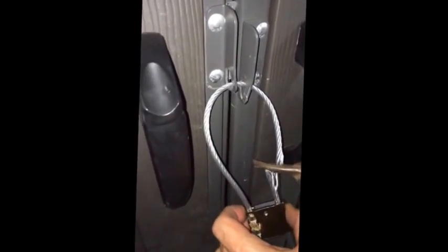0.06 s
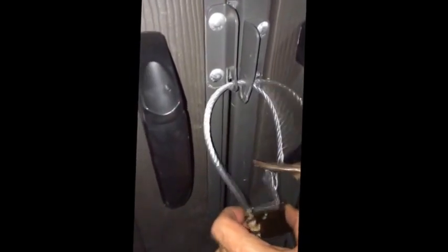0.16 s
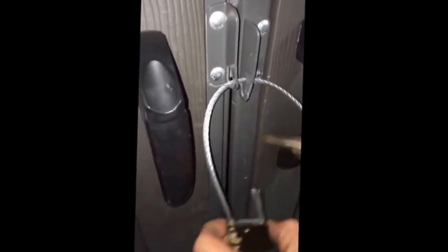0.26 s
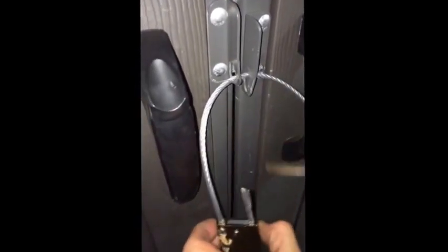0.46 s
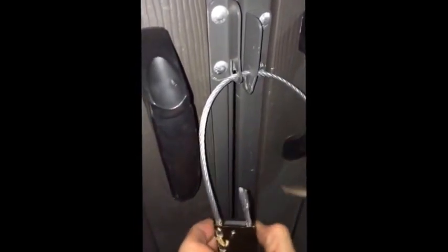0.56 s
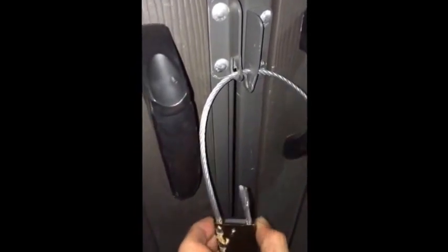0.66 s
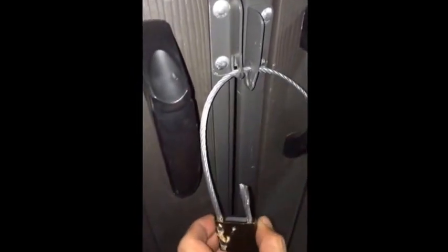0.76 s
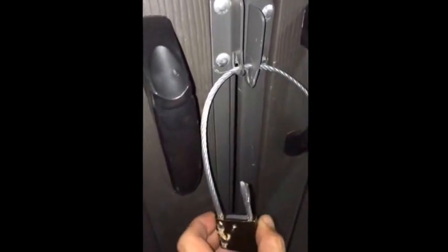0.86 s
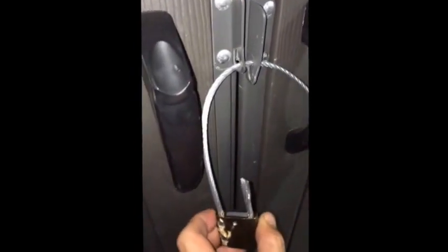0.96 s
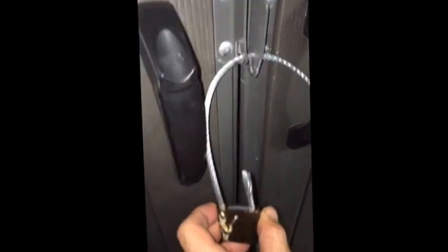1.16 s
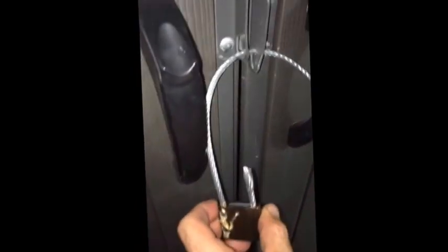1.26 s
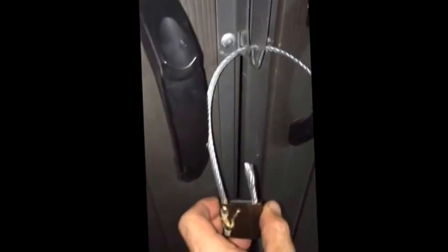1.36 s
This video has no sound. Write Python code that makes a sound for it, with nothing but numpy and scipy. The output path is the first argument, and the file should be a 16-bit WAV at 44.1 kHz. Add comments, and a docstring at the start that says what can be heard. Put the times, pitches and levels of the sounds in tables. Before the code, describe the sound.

A steel cable is cut close to the microphone: strands tick, then part in one sharp snap. The freed seal knocks a hollow door, which booms briefly. Faint finger handling follows over a low hum.

```python
"""A steel cable seal is cut at the latch of a hollow door, close to the microphone.
Over the low hum of the place, strands tick as the cutter bites, each with a short room tail.
The rest part in one snap, and the freed seal knocks the door, which booms, rocks and settles.
Then the hands shift faintly on the seal."""
import sys
import numpy as np
from scipy import signal
from scipy.fft import rfft, irfft
from scipy.io import wavfile
from scipy.ndimage import uniform_filter1d

SR = 44100
rng = np.random.default_rng(int(sys.argv[2]) if len(sys.argv) > 2 else 0)


def inscribe(sig):
    """Save sig as 16-bit PCM at rate SR to the path in sys.argv[1].

    A 1-D sig is mono; a 2-D sig holds one channel per row.
    Samples are clipped to [-1, 1] before scaling.
    """
    pcm = np.round(np.clip(np.atleast_2d(sig).T, -1, 1) * 32767)
    wavfile.write(sys.argv[1], SR, pcm.astype(np.int16))


N = 61739
KNOCK_S = 0.2468

# The bright crack of steel. Each row: frequency in Hz, level in dB.
STEEL_COLOUR = [(500, -7.5), (1500, -4.5), (2400, -11.5), (3300, -12), (4200, -2.5), (5000, -4),
                (6600, -5.5), (8000, 0), (10500, -8.5), (12000, -8.5), (13200, -10), (14500, -8),
                (16000, -17.5)]
# The ring of the cutter's jaws. Each row: frequency in Hz, level in dB, T60 in seconds.
CUTTER_MODES = [(1904, -8.5, .03), (2368, -1, 0.028), (2528, -11.5, 0.018), (4783, -12, 0.031),
                (5052, -19.5, 0.032), (8590, -16, 0.012), (12150, -24, 0.018)]


def amp(db):
    return 10 ** (np.asarray(db) / 20)


def unit_rms(x):
    return x / np.sqrt(np.mean(x ** 2) + 1e-20)


def curve_at(points, hz):
    """A curve joined by straight lines on a log-frequency axis."""
    point_hz, value = np.transpose(points)
    return np.interp(np.log(hz + 1), np.log(point_hz + 1), value)


def add(mix, start_s, sound):
    """Lay a sound into the mix at its cue."""
    part = mix[max(round(start_s * SR), 0):][:len(sound)]
    part += sound[:len(part)]


def noise(colour, size=N):
    """Noise of unit level with the given spectrum."""
    hz = np.fft.rfftfreq(size, 1 / SR)
    phases = np.exp(2j * np.pi * rng.random(len(hz)))
    return unit_rms(irfft(amp(curve_at(colour, hz)) * phases, size))


def band(centre_hz, width_hz):
    """Noise of unit level in one resonance."""
    hz = np.fft.rfftfreq(N, 1 / SR)
    phases = np.exp(2j * np.pi * rng.random(len(hz)))
    return unit_rms(irfft(phases / (1 + 2 * ((hz - centre_hz) / width_hz) ** 2), N))


def fade(t60, rise_s, size=N):
    """Quick attack, then an exponential decay of 60 dB in t60 seconds."""
    t = np.arange(size) / SR
    return np.minimum(t / rise_s, 1) * np.exp(-np.log(1000) * t / t60)


def ping(hz, db, t60, rise_s, size=N):
    """One dying sine."""
    t = np.arange(size) / SR
    return amp(db) * fade(t60, rise_s, size) * np.sin(2 * np.pi * hz * t)


def ring(modes, rise_s, size=N):
    """The modes of one body, struck together."""
    return sum(ping(hz, db, t60, rise_s, size) for hz, db, t60 in modes)


def burst(colour, t60, rise_s, size=4096):
    """A short crack of noise that keeps its colour at every hit."""
    envelope = fade(t60, rise_s, size)
    spectrum = rfft(np.roll(rng.standard_normal(size) * envelope, size // 4))
    spectrum /= np.sqrt(uniform_filter1d(abs(spectrum) ** 2, size=41))  # flatten chance peaks
    spectrum *= amp(curve_at(colour, np.fft.rfftfreq(size, 1 / SR)))
    crack = np.roll(irfft(spectrum), -size // 4)
    crack *= np.linalg.norm(envelope) / np.linalg.norm(crack)
    return crack * (np.arange(size) < size // 2)


def background():
    """A steady bed of low rumble with a hum and a thin whine."""
    # The dark noise bed. Each row: frequency in Hz, spectral density in dB.
    bed_colour = [(20, -13), (50, -2), (80, -1.5), (110, 3.5), (170, 4), (280, -7.5), (600, -16),
                  (1200, -16.5), (2100, -19.5), (3000, -32), (6000, -34), (10000, -43), (15000, -46.5)]
    # Humming resonances. Each row: centre in Hz, width in Hz, level in dB.
    hums = [(171, 19, -65.5), (1460, 79, -66)]
    bed = amp(-55.5) * noise(bed_colour)
    return bed + sum(amp(db) * band(hz, width_hz) for hz, width_hz, db in hums)


def strand_ticks(rise_s=0.00058):
    """Each strand cracks, pings at its own pitch and rings the cutter."""
    # Single strands giving way. Each row: start in seconds, level in dB,
    # relative cutter ring in dB, ping pitch in Hz, relative ping level in dB.
    strands = [(.0005, -42, -25, 7400, -7), (.0095, -44.5, -10, 8200, -3), (0.0147, -39, -54, 5040, 0),
               (0.032, -49, -28, 7600, 1), (0.043, -53, -21, 8200, 1), (0.0856, -47.5, -18, 8100, 4.5),
               (.0885, -48, -11.5, 8100, 2), (0.1116, -43, 7, 3887, -3), (0.1251, -49.5, -26, 5920, 17.5),
               (.141, -39.5, 1.5, 7300, 0), (0.1625, -53, -5.5, 5000, -18.5),
               (0.178, -52.5, -17, 7700, -5.5), (.2150, -44, 0.5, 12100, -0.5),
               (.2202, -41, -0.5, 8300, -5), (0.2293, -49, -23.5, 8200, 0.5)]
    out = np.zeros(N)
    jaws = ring(CUTTER_MODES, rise_s, size=2048)
    for start_s, db, cutter_db, ping_hz, ping_db in strands:
        crack = burst(STEEL_COLOUR, t60=0.022, rise_s=rise_s)[:2048]
        tone = ping(ping_hz, ping_db, t60=0.015, rise_s=rise_s, size=2048)
        add(out, start_s, amp(db) * (crack + tone + amp(cutter_db) * jaws))
    return out


def room(metal, predelay_s=0.0037, reflections_db=-9.5, wash_db=5.5):
    """Dense reflections trail the metal, each band dying at its own speed; a wash joins the knock."""
    # The diffuse tail. Each row: frequency in Hz, level in dB, T60 in seconds.
    tail_bands = [(60, -9.5, 0.47), (250, 1.5, .32), (400, 5, 0.46), (540, -1.5, 0.35), (961, 2.5, 0.2),
                  (1780, 3, 0.15), (2462, -6, .19), (4500, -9, 0.14), (6500, -14.5, 0.12),
                  (8700, -13, 0.12), (15000, -28.5, .12)]
    hz, t, spectrum = signal.stft(rng.standard_normal(SR), SR, nperseg=256)
    db = curve_at(np.array(tail_bands)[:, [0, 1]], hz)[:, None]
    t60 = curve_at(np.array(tail_bands)[:, [0, 2]], hz)[:, None]
    decay = np.exp(-np.log(1000) * t / t60)
    equal_energy = np.sqrt(2 * np.log(1000) / (t60 * SR))
    tail = signal.istft(spectrum * amp(db) * decay * equal_energy, SR, nperseg=256)[1]
    out = np.zeros(N)
    add(out, predelay_s, amp(reflections_db) * signal.fftconvolve(metal, tail)[:N])
    add(out, KNOCK_S, amp(wash_db) * tail)
    return out


def cable_snap():
    """The remaining strands part within a few milliseconds and the jaws ring."""
    # The last strands breaking. Each row: start in seconds, level in dB.
    breaks = [(0.2364, -21.5), (.2383, -26.5), (.2392, -15), (0.2399, -21.5)]
    # The hard bite of the snap. Each row: frequency in Hz, level in dB.
    snap_colour = [(200, -26.5), (1000, -9.5), (1900, 0), (2350, 2), (3000, -5), (4000, 1.5), (4650, 1.5),
                   (5300, 2), (6200, -13), (7200, -5.5), (7900, -5), (8700, 2), (10500, -9), (12300, -8),
                   (15000, -15.5)]
    out = np.zeros(N)
    for start_s, db in breaks:
        add(out, start_s, amp(db) * burst(snap_colour, t60=0.013, rise_s=0.0001))
    add(out, breaks[0][0], amp(-8.5) * ring(CUTTER_MODES, rise_s=0.0015))
    return out


def latch_knock(clink_s=0.2471, clink_t60=0.0032):
    """Metal hits the latch: a bright, gritty clink on a dull clack."""
    # The body of the clack. Each row: frequency in Hz, level in dB.
    clack_colour = [(40, -39.5), (150, -10.5), (400, 3.5), (540, -5), (850, 3), (1500, -1.5), (2200, -12.5),
                    (3800, -8), (5200, -8), (7000, -24.5), (11000, -26), (15000, -32)]
    out = np.zeros(N)
    add(out, KNOCK_S, amp(-12.5) * burst(clack_colour, t60=0.017, rise_s=0.0004))
    grit = amp(-19.5) * noise(STEEL_COLOUR, size=512) * fade(clink_t60, rise_s=0.00032, size=512)
    clink = ping(hz=8310, db=-5.5, t60=clink_t60, rise_s=0.0003, size=512)
    add(out, clink_s, grit + clink)
    return out


def door_boom(settle_s=0.402, settle_t60=0.36):
    """The hollow door booms at each jolt over a rough rumble, then is damped against its frame."""
    # The door's modes. Each row: frequency in Hz, level in dB, T60 in seconds.
    door_modes = [(54, -43.5, .45), (102.1, -30, .52), (129.2, -34.5, 0.14), (169.8, -21.5, 0.54),
                  (187.5, -25.5, 0.28), (220.3, -37.5, 0.38), (338.4, -30, 0.29), (369.7, -22.5, 0.074),
                  (430.6, -34, 0.11), (632, -31, 0.11), (859, -26.5, 0.11), (927, -28.5, 0.055),
                  (1143, -38.5, 0.077), (1537, -24, 0.086)]
    # One jolt, then ever duller rocking on the latch.
    # Each row: start in seconds, level in dB, low-pass edge in Hz.
    jolts = [(.2490, 1, 1600), (0.2801, -10, 325), (0.3288, -8.5, 203.8), (0.4102, -18.5, 190),
             (.485, -4.5, 109)]
    # The panel's dense low rumble. Each row: frequency in Hz, spectral density in dB.
    rumble_colour = [(25, -34.5), (36, -5), (55, 3.5), (100, 5), (135, 3), (260, -9), (420, -22),
                     (900, -53.5)]
    out = np.zeros(N)
    hz = np.fft.rfftfreq(2 * N, 1 / SR)
    boom = rfft(ring(door_modes, rise_s=0.0016), 2 * N)
    for start_s, db, edge_hz in jolts:
        dulling = 1 / (1 + (hz / edge_hz) ** 4)
        delay = np.exp(-2j * np.pi * hz * start_s)
        out += amp(db) * irfft(boom * dulling * delay)[:N]
    rumble = amp(-33) * noise(rumble_colour) * fade(t60=0.7, rise_s=0.0029)
    add(out, jolts[0][0], rumble)
    damped_for_s = np.maximum(np.arange(N) / SR - settle_s, 0)
    return out * np.exp(-np.log(1000) * damped_for_s / settle_t60)


def handling(grain_db=1.5):
    """Fingers slide and tap on the seal, with a few faint hollow swells."""
    # The fader ride of the sliding fingers. Each row: time in seconds, level in dB.
    slide_levels = [(0, -66), (.045, -55.5), (.07, -68), (.42, -76.5), (.45, -69.5), (.55, -111), (.6, -68),
                    (.65, -83.5), (.7, -76), (.82, -83.5), (.875, -67.5), (.94, -81), (.98, -68),
                    (1.06, -72.5), (1.15, -66.5), (1.27, -67), (1.33, -67), (1.39, -65.5)]
    # The hiss of the slide. Each row: frequency in Hz, level in dB.
    slide_colour = [(500, 10), (2000, 5), (4500, 1), (7000, -1), (10000, -7.5), (15000, -11.5)]
    # Fingers and loose seal tapping. Each row: start in seconds, level in dB, relative ping in dB.
    taps = [(0.344, -60, -21), (.9672, -54.5, -20), (1.367, -57, 1)]
    # The light click of a tap. Each row: frequency in Hz, level in dB.
    tap_colour = [(500, -13.5), (1500, -6.5), (4200, 2), (5000, -1), (5900, -3), (7000, -1.5), (10000, -8),
                  (15000, -18)]
    # Hollow swells. Each row: peak time and half length in seconds, pitch and width in Hz, level in dB.
    swells = [(.68, 0.034, 519, 31.7, -57.5), (0.718, 0.042, 1207, 36.6, -61),
              (0.739, .11, 850, 600, -65.5), (0.789, 0.057, 460, 123, -63), (1.28, 0.015, 987, 298, -65)]
    t = np.arange(N) / SR
    flicker = unit_rms(uniform_filter1d(rng.standard_normal(N), 150))
    grain = unit_rms(amp(grain_db * flicker))
    slide_db = np.interp(t, *np.transpose(slide_levels))
    out = amp(slide_db) * grain * noise(slide_colour)
    for start_s, db, ping_db in taps:
        click = burst(tap_colour, t60=0.025, rise_s=0.001)
        tone = ping(hz=5770, db=ping_db, t60=0.05, rise_s=0.001, size=4096)
        add(out, start_s, amp(db) * (click + tone))
    for peak_s, half_s, hz, width_hz, db in swells:
        envelope = np.exp(-0.5 * ((t - peak_s) / half_s) ** 2)
        out += amp(db) * envelope * band(hz, width_hz)
    return out


def scene():
    """The cut, its reflections, the door and the quiet around them, in mono."""
    metal = strand_ticks() + cable_snap() + latch_knock()
    return (metal + room(metal) + door_boom() + handling() + background())[None]


def record(dry, low_cut_hz=37.4, high_cut_hz=15400):
    """The small microphone loses the lowest bass; a steep filter takes off the very top."""
    low_cut = signal.butter(2, low_cut_hz, "high", fs=SR, output="sos")
    high_cut = signal.firwin(201, high_cut_hz, window=("kaiser", 9), fs=SR)
    return signal.oaconvolve(signal.sosfilt(low_cut, dry), high_cut[None], "same")


dry = scene()
out = record(dry)
inscribe(out)
```